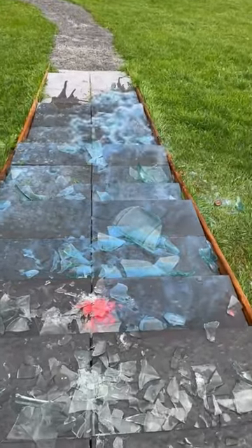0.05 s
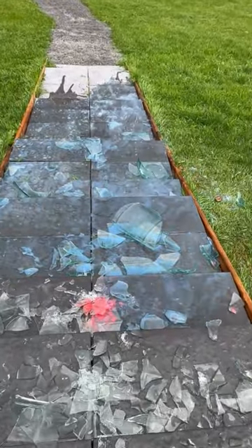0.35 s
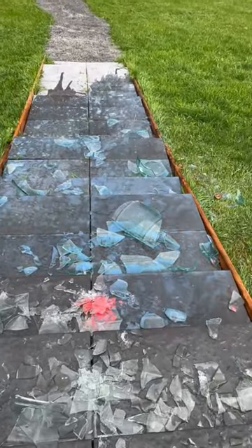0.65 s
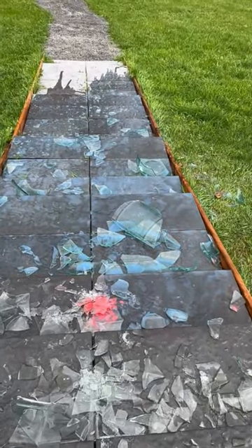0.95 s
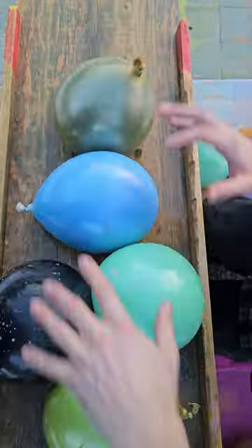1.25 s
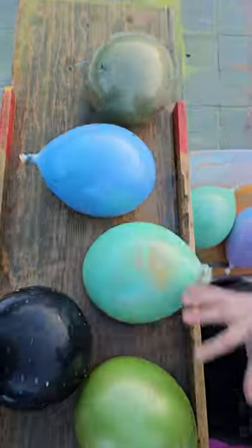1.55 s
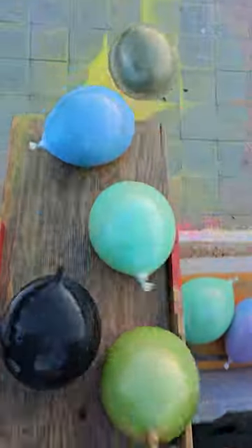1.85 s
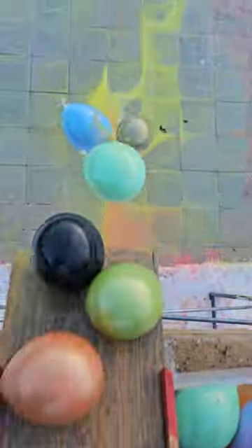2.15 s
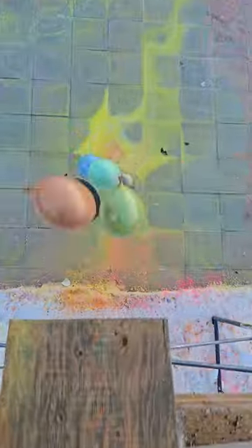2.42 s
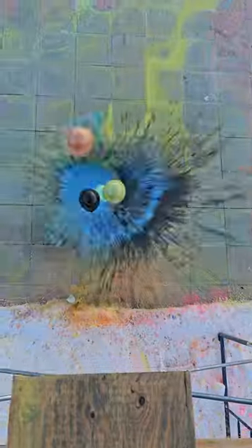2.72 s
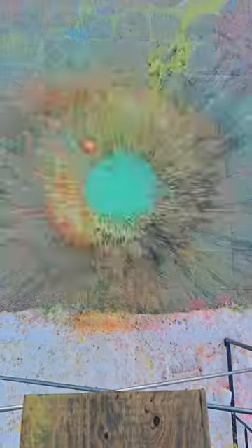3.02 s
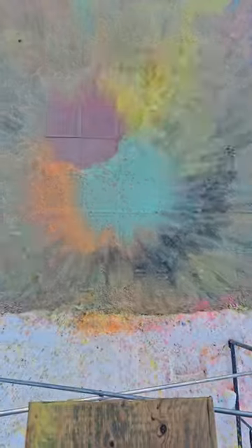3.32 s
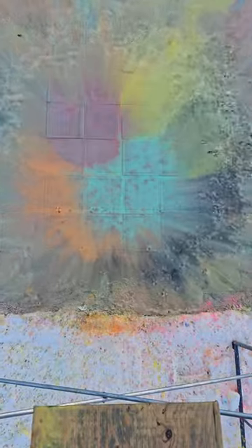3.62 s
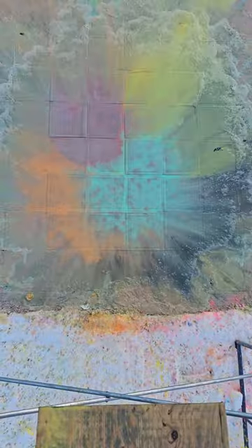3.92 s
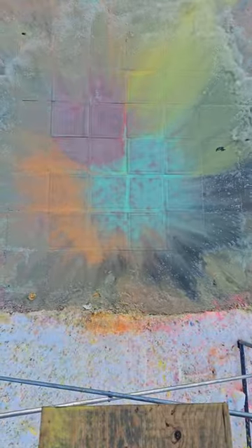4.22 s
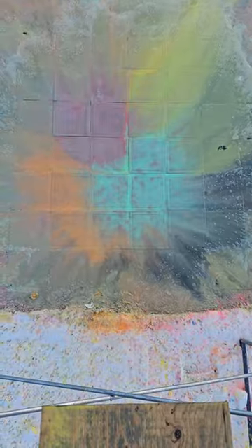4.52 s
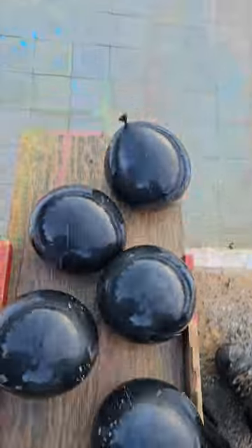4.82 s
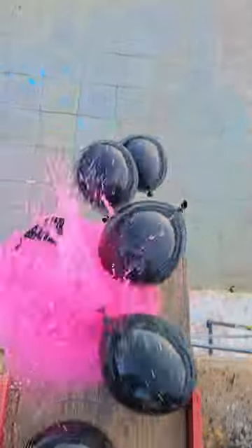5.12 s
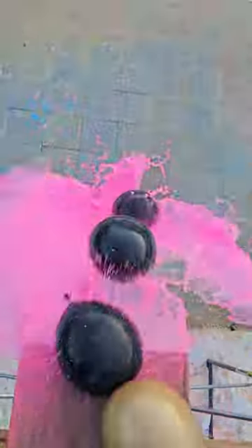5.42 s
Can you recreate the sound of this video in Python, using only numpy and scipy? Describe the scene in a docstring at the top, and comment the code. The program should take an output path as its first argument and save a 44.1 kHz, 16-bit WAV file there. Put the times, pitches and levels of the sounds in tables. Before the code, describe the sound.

After a brief tinkle of broken glass, paint balloons rumble and slosh over wood, splatter on the ground, and one rips open nearby.

```python
"""A quiet yard. The last pieces of a smashed glass jar clink and skitter down a flight of hard steps.
Paint-filled balloons then rumble, slosh, squeak and bump along a wooden ramp and burst one after another
on the paving far below: the liquid thuds, the skin slaps, paint jets out and rains down as spray.
A second batch rolls along the ramp; one balloon rips open close by and its paint gurgles over the board."""
import sys
import numpy as np
from scipy import signal
from scipy.fft import rfft, irfft, next_fast_len
from scipy.io import wavfile

SR = 44100
rng = np.random.default_rng(int(sys.argv[2]) if len(sys.argv) > 2 else 0)


def dump_mix(stems):
    """Bounce the given channels to the path in sys.argv[1] as a 16-bit WAV at rate SR."""
    frames = np.atleast_2d(stems).T  # one column per channel
    limited = np.clip(frames, -1, 1)  # hard clip at full scale
    pcm = np.round(limited * 32767).astype(np.int16)
    wavfile.write(sys.argv[1], SR, pcm)


N = 245195

# Table levels are faders ahead of each layer's own gain; spectra give tone colour only.
# glass landing on a step: t/s, clink level/dB, knock level/dB
LANDINGS = [(0.0034, -44, -43), (0.025, -42, -54), (0.0485, -37.5, -46), (0.0668, -32.5, -36.5),
            (0.0813, -38, -52), (0.1044, -42, -48), (0.2015, -36, -55), (0.2225, -47, -40),
            (0.3343, -41.5, -51), (0.3598, -39.5, -42.5), (0.445, -45, -45.5), (0.4773, -35.5, -75),
            (0.4909, -40.5, -48.5), (0.554, -65, -50), (0.5927, -46, -65), (0.6231, -41.5, -54),
            (0.716, -35, -64), (0.823, -49, -75), (0.863, -45, -82), (0.9342, -38, -76), (0.9808, -50, -82),
            (1.031, -51.5, -77), (1.0827, -42, -70), (1.1393, -36, -68)]
# modes of the tumbling piece of jar: f/Hz, level/dB, t60/s
JAR_MODES = [(1552, 6.5, 0.05), (1720, 5.5, 0.074), (2150, -11, 0.16), (2410, -17, .1), (2690, 7, 0.034),
             (2920, -2, 0.098), (3233, 4.5, 0.036), (3260, -14, 0.072), (3570, -13, 0.057),
             (3870, -2.5, 0.06), (5550, -15, 0.13), (6030, -11.5, 0.12), (6300, -25, 0.055),
             (6520, -14, 0.11), (7300, -30, 0.12), (7500, -29, 0.082), (7500, -28, 0.11),
             (9500, -34, 0.091), (9350, -38, .07)]
# modes of one long-ringing shard: f/Hz, level/dB, t60/s
SHARD_MODES = [(1494, -50, 0.87), (1870, -48.5, 0.53), (2520, -44, 0.25)]
# crunch of glass chips: f/Hz, level/dB
CHIP_EQ = [(650, -46), (1100, -15), (1800, -4), (2270, -6), (3110, -3.5), (3960, -5), (4160, -16.5),
           (7340, -8.5), (9430, -31), (11000, -52), (14300, -82), (22000, -120)]
# knock of a step: f/Hz, level/dB
STEP_EQ = [(110, -49), (180, -6), (396, -9), (669, 3), (1070, -11.5), (1260, -5.5), (1500, -24),
           (1950, -39), (3300, -120)]
# low ambience by the steps: f/Hz, level/dB
STEPS_AIR_EQ = [(15, -37), (25, -13), (74, 14), (273, -10), (585, -9), (981, -14.5), (1570, -15),
                (2380, -34), (2760, -20), (3280, -25), (4630, -31), (6530, -29), (9000, -37), (11700, -74),
                (19800, -120)]
# batches rolling down the ramp: start t/s, end t/s, first level/dB, swell/(dB/s), dryness/dB
BATCHES = [(1.275, 2.609, -7.5, 8, -0.5), (4.69, 5.6, -4, 6.5, 1)]
# a balloon lurching along the wood: t/s, rumble level/dB, slosh level/dB, scuff level/dB
LURCHES = [(1.705, -49.5, -54, -58), (1.765, -58, -49.5, -58), (1.83, -49, -60, -68),
           (1.946, -41, -59, -66), (2.044, -49, -50, -53), (2.09, -50, -69, -59), (2.305, -25, -48.5, -62),
           (2.355, -37, -54.5, -71), (2.395, -37, -45, -49.5), (2.43, -40.5, -44.5, -56),
           (2.478, -38.5, -48, -59), (4.825, -56, -67, -54), (5.001, -49, -55, -49.5),
           (5.301, -68, -48, -78), (5.524, -45, -66, -52)]
# rumble of the ramp: f/Hz, level/dB
ROLL_EQ = [(15, -37), (25, -1), (70, 1), (94, 3), (134, -5), (242, -2), (274, -4), (314, -12), (370, -13.5),
           (500, -10), (650, -40), (1100, -120)]
# sloshing paint: f/Hz, level/dB
SLOSH_EQ = [(210, -32), (350, -11), (639, 0), (958, -3.5), (1300, -1), (1460, -2.5), (3000, -14),
            (3900, -47), (6600, -120)]
# rubbing and spatter on wood: f/Hz, level/dB
RUB_EQ = [(1120, -34), (1900, -14), (2530, -4), (4280, -4), (6620, -11.5), (10500, -15.5), (11400, -13.5),
          (15000, -19.5), (16000, -15)]
# fine stick-slip of rubber on wood: f/Hz, level/dB
SIZZLE_EQ = [(5000, -19), (9000, -5.5), (12000, 0.5), (16000, 0.5)]
# ambience of the yard: f/Hz, level/dB
YARD_AIR_EQ = [(18, -68), (30, -33.5), (64, -13.5), (98, -5.5), (145, -8.5), (245, -11), (328, -18.5),
               (364, -4), (394, -21.5), (988, -32.5), (2540, -52), (4300, -39), (6550, -34), (11400, -34),
               (16000, -34.5)]
# rubber squeaks: t/s, length/s, first f/Hz, last f/Hz, level/dB
SQUEAKS = [(1.433, 0.015, 8500, 8960, -55.5), (1.824, 0.09, 2000, 2190, -56.5),
           (1.835, 0.078, 291.5, 366, -41.5), (2.077, 0.048, 632, 837, -45),
           (2.564, 0.0081, 1223, 1453, -25.5), (5.002, 0.017, 914, 720, -36)]
# balloons bumping the ramp: t/s, tick level/dB, board level/dB
BUMPS = [(1.483, -41.5, -48), (1.523, -43.5, -46.5), (1.7003, -28.5, -40.5), (1.7513, -22.5, -36),
         (1.9641, -27.5, -30.5), (1.9804, -25, -21.5), (2.570, -39.5, -30), (4.784, -42, -56),
         (4.822, -29, -40), (4.832, -34, -31.5), (4.8471, -13, -12.5), (5.0194, -23.5, -35),
         (5.0226, -29.5, -30), (5.0553, -27, -31.5), (5.311, -40, -41.5), (5.536, -28, -41.5)]
# modes of the ramp's board: f/Hz, level/dB, t60/s
BOARD_MODES = [(195, -7.5, 0.25), (237.7, -8, 0.2), (295, -1, 0.06), (452, -6, 0.054), (492.3, -4, 0.079),
               (693, -2.5, 0.055), (845, -6, 0.03), (1240, -11, 0.046), (1441, -5.5, 0.028),
               (1870, -7.5, 0.028), (1954, -24.5, 0.022)]
# thuds and plops of the liquid mass: t/s, level/dB, f/Hz, cycles to the peak, overtone level/dB
THUDS = [(1.902, -27.5, 204, 1.1, -24), (1.984, -21.5, 221.5, 2, -4), (2.263, -10.5, 180, 0.78, -16.5),
         (2.277, -15.5, 227, 0.42, -7.5), (2.537, -20.5, 229, 2.3, -24.5), (2.594, -12.5, 163, 0.63, -21.5),
         (2.613, -3, 204.4, 1.32, -5), (2.643, -8.5, 253.7, 2.7, -21.5), (2.718, -12.5, 228, 0.81, -18),
         (2.774, -3, 243, 2.1, -9.5), (2.796, -3.5, 217.5, 2.6, -16), (2.887, -5.5, 202, 0.71, -26.5),
         (2.902, -17.5, 176, 0.8, -26.5), (2.931, -13, 159, 0.97, -20.5), (2.976, -15.5, 197, 1, -37.5),
         (3.009, -21, 194, 1.73, -33), (3.037, -23.5, 136, 1.3, -28), (4.853, -15.5, 227, 1.8, -15),
         (4.885, -28, 215, 1.6, -39), (5.027, -26, 237, 1, -21), (5.088, -20, 212, 2.05, -15.5)]
# faster shapes of the wobbling mass: multiple of its pitch, level/dB
OVERTONES = [(1.92, 3), (3.15, -4.5)]
# quiver after a thud: f/Hz, level/dB
QUIVER_EQ = [(45, -17), (85, 2), (130, -0.5), (270, 1.5), (340, -10), (520, -15), (750, -34.5)]
# a balloon flopping or bursting: t/s, hiss level/dB, slap level/dB, hold/s
BURSTS = [(2.274, -56, -40, .008), (2.301, -44, -28.5, 0.042), (2.5746, -21.5, -18, 0.0022),
          (2.613, -32.5, -9.5, 0.0049), (2.628, -23, -16, 0.0096), (2.638, -26.5, -20, 0.0078),
          (2.693, -29, -47.5, .002), (2.736, -21.5, -22.5, 0.018), (2.771, -43, -24.5, .06),
          (2.853, -27, -34.5, .018), (2.9455, -22, -21.5, 0.0093), (3.036, -22.5, -31.5, 0.0074),
          (3.118, -19.5, -13.5, 0.00099)]
# jetting liquid: f/Hz, level/dB
JET_EQ = [(1000, -2.5), (2000, 4), (3800, 8), (6000, 0), (9000, -1), (16000, -8.5)]
# skin slapping the ground: f/Hz, level/dB
SLAP_EQ = [(200, -1), (400, -5), (750, 2.5), (1400, -3.5), (2200, -12.5), (4000, -29.5)]
# falling drops: f/Hz, level/dB
SPRAY_EQ = [(1120, -36.5), (1900, -8.5), (2690, -5), (4280, 0.5), (6680, -5.5), (7430, -2.5), (10700, -5.5),
            (15200, -4), (16000, -18)]
# a balloon ripping close by: t/s, level/dB, rise/s, hold/s
RIPS = [(5.079, -13.5, 0.0096, 0.0075), (5.4008, -34.5, 0.00051, 0.0014)]
# tearing rubber: f/Hz, level/dB
RIP_EQ = [(350, -31), (600, -2), (1210, 1.5), (1850, -14), (2120, -4), (8860, -4.5), (9360, -2),
          (14300, -5.5), (16000, -12)]
# focused stereo image, straight ahead: f/Hz, left-right correlation
AHEAD = [(100, .98), (1000, 0.67), (10000, 0.23)]
# diffuse stereo image: f/Hz, left-right correlation
WIDE = [(100, 0.95), (300, 0.74), (700, 0.03), (1500, 0), (4000, 0), (16000, 0)]
# stereo image from below, solid mids and open top: f/Hz, left-right correlation
BELOW = [(200, 0.76), (1000, 0.85), (3000, 0.089), (16000, 0.1)]

STEPS_UNTIL_S, SHOWER_AT_S = 1.285, 2.611


def amp(db):
    """Decibels to gain."""
    return 10 ** (np.asarray(db) / 20)


def rms_one(x):
    """Scale to unit rms."""
    return x / np.sqrt(np.mean(x ** 2) + 1e-20)


def seconds():
    """The time of every sample."""
    return np.arange(N) / SR


def during(start, end):
    """A gate with 10 ms edges, open between two times."""
    t = seconds()
    return np.clip((t - start) / .01 + .5, 0, 1) * np.clip((end - t) / .01 + .5, 0, 1)


def surge(s, rise, hold, t60):
    """An envelope from time s: linear attack, then a release that begins at s + hold."""
    age = np.maximum(seconds() - s, 0)
    return np.minimum(age / rise, 1) * np.exp(-np.log(1000) * np.clip((age - hold) / t60, 0, 10))


def gush(s, rise, hold, t60, tail_db, tail_t60):
    """A surge with a fainter, longer tail."""
    return surge(s, rise, hold, t60) + amp(tail_db) * surge(s, rise, hold, tail_t60)


def drift(rate):
    """Random modulation gliding through `rate` values a second, each of spread 1."""
    knots = rng.standard_normal(int(N / SR * rate) + 2)
    return np.interp(seconds() * rate, np.arange(len(knots)), knots)


def at_hz(points, hz):
    """Read a curve on a log-frequency axis."""
    f, value = np.transpose(points)
    return np.interp(np.log(hz), np.log(f), value)


def colour(pair, eq, image):
    """Two unrelated signals become mid and side of an equalised stereo pair; rms 1."""
    size = next_fast_len(N)
    hz = np.maximum(np.fft.rfftfreq(size, 1 / SR), 1)
    octaves_outside = np.abs(np.log2(hz / np.clip(hz, eq[0][0], eq[-1][0])))
    gain = amp(at_hz(eq, hz) - 30 * octaves_outside)
    alike = np.clip(at_hz(image, hz), -1, 1)
    mid, side = rfft(pair, size) * gain * np.sqrt([1 + alike, 1 - alike])
    return rms_one(irfft([mid + side, mid - side], size)[:, :N])


def noise(eq, image):
    """Smooth coloured stereo noise."""
    return colour(rng.standard_normal((2, N)), eq, image)


def grains(per_s, spread_db):
    """Two streams of random tiny impacts, many small and a few large; rms 1."""
    sizes = amp(spread_db * np.minimum(rng.exponential(1, (2, N)), 4))
    return rms_one(sizes * rng.choice([-1, 1], (2, N)) * (rng.random((2, N)) < per_s / SR))


def strikes(times, db):
    """One click for each event."""
    out = np.zeros(N)
    out[np.clip(np.round(times * SR).astype(int), 0, N - 1)] = amp(db)
    return out


def decays(times, db, t60):
    """Each event triggers an exponentially falling envelope."""
    return signal.lfilter([1], [1, -amp(-60 / (t60 * SR))], strikes(times, db) + 1e-18)


def ring(clicks, hz, t60):
    """A unit click sets a sine of height 1 ringing."""
    r, w = amp(-60 / (t60 * SR)), 2 * np.pi * hz / SR
    return signal.lfilter([0, np.sin(w)], [1, -2 * r * np.cos(w), r * r], clicks + 1e-18)


def struck(modes, times, db, chatter, vary_db, width):
    """Every blow excites each mode with its own strength, a little differently on each side."""
    out = np.zeros((2, N))
    for hz, level_db, t60 in modes:
        mid_vary, side_vary, jitter = np.clip(rng.standard_normal((len(times), 3)), -1.5, 1.5).T
        sign = rng.choice([-1, 1])
        mid = strikes(times, db + vary_db * mid_vary) * sign + chatter[0]
        side = width * (strikes(times + jitter / hz, db + vary_db * side_vary) + chatter[1])
        out += amp(level_db) * ring(np.array([mid + side, mid - side]), hz, t60)
    return out


def pan(x, right_db):
    """Lean a sound to the right."""
    return x * amp([[-right_db / 2], [right_db / 2]])


def lag(x, left_late_ms):
    """Pan by delay: a sound reaches the farther side later."""
    t, half = seconds(), left_late_ms / 2000
    return np.array([np.interp(t - half, t, x[0]), np.interp(t + half, t, x[1])])


def yard_reverb(x, wet_db, t60, dull_hz):
    """Nearby walls and ground scatter back a short, dull tail."""
    t = np.arange(SR // 2) / SR
    scatter = rng.standard_normal((2, len(t))) * amp(-60 * t / t60) * (t > .006)
    bass = signal.butter(1, 500, fs=SR)
    scatter += signal.lfilter(*bass, scatter[0] - scatter)   # long waves reach both sides alike
    scatter /= np.sqrt(np.sum(scatter[0] ** 2))
    tail = signal.lfilter(*signal.butter(1, dull_hz, fs=SR), scatter)
    return x + amp(wet_db) * signal.fftconvolve(x, tail, axes=1)[:, :N]


def touches(rebound_s=0.014):
    """After each landing the glass drops back once, more softly: times, clink and knock levels."""
    landings = np.array(LANDINGS)
    rebounds = landings + [0, -8, -7.5]
    rebounds[:, 0] += rebound_s * rng.uniform(.75, 1.25, len(landings))
    return np.vstack([landings, rebounds]).T


def loose_shards(times, db, t60, late_s, count):
    """Each landing knocks other pieces about, each with a pitch of its own; small ones are fainter."""
    out, t = np.zeros((2, N)), np.arange(SR // 6) / SR
    for s, level_db, pieces in zip(times, db, rng.random((len(times), count, 3))):
        for pitch, late, side in pieces:
            hz, start = 1400 * 7 ** pitch, int((s + late_s * late ** 2) * SR)
            tone = amp(level_db - 11 * pitch - 60 * t / t60) * np.sin(2 * np.pi * hz * t)
            out[:, start:start + len(t)] += pan(tone, right_db=5.7 * (side - .5))
    return out


def jar(shard_at_s=0.054):
    """The piece of jar rings, chatters and chips on each landing, and the step knocks under it."""
    times, clink_db, knock_db = touches()
    chatter = amp(-19) * decays(times, clink_db, t60=0.061) * grains(per_s=500, spread_db=4.5)
    rings = amp(-19.5) * struck(JAR_MODES, times, clink_db, chatter, vary_db=9.5, width=0.039)
    loose = amp(-15.5) * loose_shards(times, clink_db, t60=0.057, late_s=0.024, count=18)
    shard = sum(ring(strikes(np.array([shard_at_s]), db), hz, t60) for hz, db, t60 in SHARD_MODES)
    crunch = colour(grains(per_s=1400, spread_db=2), CHIP_EQ, AHEAD)
    chips = amp(-10.5) * decays(times, clink_db, t60=0.075) * crunch
    knocks = amp(-1.5) * decays(times, knock_db, t60=0.084) * noise(STEP_EQ, AHEAD)
    high_cut = signal.butter(8, 10000, fs=SR, output="sos")
    return signal.sosfilt(high_cut, rings + loose + shard + chips + knocks)


def steps(swell_db_per_s=9.5):
    """A slowly swelling bed of hum and rumble lies under splinters that skitter on after each landing."""
    times, clink_db, _ = np.transpose(LANDINGS)
    bed_db = -63.5 + swell_db_per_s * np.minimum(seconds(), STEPS_UNTIL_S) + 0.58 * drift(rate=28)
    hum = np.sin(2 * np.pi * np.cumsum(73 + 2 * drift(rate=11.95)) / SR)
    bed = amp(bed_db) * (noise(STEPS_AIR_EQ, AHEAD) + amp(2) * hum)
    splinters = colour(grains(per_s=900, spread_db=3), CHIP_EQ, AHEAD)
    grit = decays(times, clink_db - 31.5, t60=0.49) * splinters
    return (bed + grit) * (1 - during(STEPS_UNTIL_S, N / SR + 1))


def bubbles(per_s, cycles):
    """Small pockets in the liquid ring for some cycles each, rising in pitch as they surface."""
    out, t = np.zeros((2, N + SR // 20)), np.arange(SR // 20) / SR
    for when, pitch, size, side in rng.random((int(per_s * N / SR), 4)):
        hz, start = 450 * 10 ** pitch, int(when * N)
        age = t * hz / cycles
        blip = amp(-20 * np.sqrt(size) - 60 * age) * np.sin(2 * np.pi * hz * t * (1 + .15 * age))
        out[:, start:start + len(t)] += pan(blip, right_db=10 * (side - .5))
    return rms_one(out[:, :N])


def ramp():
    """Balloons gather speed, rumbling, sloshing and rubbing on the wood; paint washes over the paving."""
    speed, dryness = np.zeros(N), np.ones(N)
    for start, end, db, db_per_s, dry_db in BATCHES:
        gate = during(start, end)
        speed += amp(db + db_per_s * np.clip(seconds() - start, 0, end - start)) * gate
        dryness *= amp(dry_db * gate)
    rolling = amp(-48) * speed
    sloshing = amp(-55.5) * speed / dryness
    sliding = amp(-60) * dryness * speed ** 1.4   # rubbing grows faster with speed than the rest
    for s, rumble_db, slosh_db, scuff_db in LURCHES:
        lurch = surge(s, rise=0.01, hold=0.016, t60=.16)
        rolling += amp(rumble_db) * lurch
        sloshing += amp(slosh_db) * lurch
        sliding += amp(scuff_db) * lurch
    sloshing += amp(-40.5) * surge(SHOWER_AT_S, rise=0.01, hold=0.41, t60=1.8)   # wash on the paving
    roll = rolling * amp(0.91 * drift(rate=25)) * noise(ROLL_EQ, WIDE)
    swish = amp(-1.5) * colour(grains(per_s=2300, spread_db=0.5), SLOSH_EQ, WIDE)
    slosh = sloshing * amp(3.6 * drift(rate=19)) * (swish + amp(-5) * bubbles(per_s=260, cycles=38))
    flutter = amp(1.5 + 2 * drift(rate=70))
    rub = sliding * flutter * colour(grains(per_s=6900, spread_db=4), RUB_EQ, WIDE)
    sizzle = colour(grains(per_s=3000, spread_db=4.5), SIZZLE_EQ, WIDE)
    rub += amp(-66.5) * speed * dryness ** 2 * sizzle
    return roll + slosh + pan(rub, right_db=4)


def yard_air():
    """Faint, wide ambience takes over from the bed by the steps."""
    return amp(-60) * noise(YARD_AIR_EQ, WIDE) * during(STEPS_UNTIL_S, N / SR + 1)


def squeaks():
    """Rubber sticks and slips in short, unsteady glides."""
    out, waver = np.zeros(N), 1 + .022 * drift(rate=400)
    for s, length, first_hz, last_hz, db in SQUEAKS:
        along = np.clip((seconds() - s) / length, 0, 1)
        hz = (first_hz + (last_hz - first_hz) * along) * waver
        out += amp(db) * np.sin(np.pi * along) * np.sin(2 * np.pi * np.cumsum(hz) / SR)
    return out


def bumps():
    """Taut rubber ticks against the wood and the board answers with a hollow, damped knock."""
    times, tick_db, board_db = np.transpose(BUMPS)
    rattle = amp(-22) * decays(times, board_db, t60=0.038) * grains(per_s=600, spread_db=3)
    board = amp(-6) * struck(BOARD_MODES, times, board_db, rattle, vary_db=5.5, width=0.19)
    body = noise([(170, -13), (450, -2), (800, -5), (1300, -11.5)], WIDE)
    wobble = amp(-1.5) * decays(times, board_db, t60=0.068) * body
    tick = noise([(600, -4), (1300, -1), (2400, -2.5), (4000, 4.5), (6500, -12), (10000, -17),
                  (16000, -26.5)], BELOW)
    snap = decays(times, tick_db, t60=0.013) + amp(-16.5) * decays(times, tick_db, t60=0.071)
    return lag(board + wobble, left_late_ms=-0.19) + pan(amp(-4.5) * snap * tick, right_db=4)


def swing(s, hz, cycles_to_peak):
    """A pressure swing that swells and dies within a few cycles."""
    out, near = np.zeros(N), slice(int(s * SR), int(s * SR) + SR // 8)
    cycles = np.maximum(seconds()[near] - s, 0) * hz
    swell = cycles / cycles_to_peak
    out[near] = (swell * np.exp(1 - swell)) ** 3 * np.sin(2 * np.pi * cycles)
    return out


def thuds(overtone_span=.75, slump_late_s=.009, quiver_t60=0.35):
    """A landing mass of liquid shoves the air for a few cycles, slumps more slowly, and quivers on."""
    out = np.zeros(N)
    for s, peak_db, hz, cycles_to_peak, overtones_db in THUDS:
        upper = sum(amp(overtones_db + db) * swing(s, hz * ratio, cycles_to_peak * ratio * overtone_span)
                    for ratio, db in OVERTONES)
        slump = amp(-11) * swing(s + slump_late_s, hz * .56, cycles_to_peak=1.2)
        out += amp(peak_db) * (swing(s, hz, cycles_to_peak) + upper + slump)
    times, peak_db = np.transpose(THUDS)[:2]
    quiver_power = decays(times + slump_late_s, 2 * (peak_db - 14.5), quiver_t60 / 2)   # powers add
    return lag([out, out], left_late_ms=.42) + np.sqrt(quiver_power) * noise(QUIVER_EQ, WIDE)


def bursts(rise_s=.0006):
    """The skin slaps the ground and parts with a crack; liquid jets out and breaks into drops."""
    hiss_level, slap_level = np.zeros(N), np.zeros(N)
    for s, hiss_db, slap_db, hold in BURSTS:
        jet = gush(s, rise_s, hold, t60=0.036, tail_db=-11.5, tail_t60=.13)
        crack = amp(-11.5) * surge(s, rise_s, hold=0.001, t60=.012)
        hiss_level += amp(hiss_db) * (jet + crack)
        slap_level += amp(slap_db) * jet
    hiss = amp(-5.5) * hiss_level * colour(grains(per_s=4200, spread_db=3), JET_EQ, BELOW)
    slap = amp(-6.5) * slap_level * colour(grains(per_s=3000, spread_db=1.5), SLAP_EQ, AHEAD)
    return pan(hiss, right_db=2) + pan(lag(slap, left_late_ms=0.51), right_db=1)


def shower(build_s=0.5, flight_s=0.61, mist_db=-72.5):
    """Paint thrown up by the bursts rains down as fine drops; a last mist settles until the next batch."""
    drops = colour(grains(per_s=16000, spread_db=3.5), SPRAY_EQ, WIDE)
    past_peak = seconds() - SHOWER_AT_S - build_s
    build_db = 11.5 * np.minimum(past_peak, 0)   # balloons keep bursting
    thin_db = -12 * np.clip(past_peak, 0, flight_s)   # drops are still in the air
    stop_db = -71 * np.maximum(past_peak - flight_s, 0)   # the highest have landed
    level = np.hypot(amp(-37 + build_db + thin_db + stop_db), amp(mist_db))
    return pan(level * drops, right_db=0.5) * during(SHOWER_AT_S, BATCHES[1][0])


def rips():
    """A tear races through the stretched rubber in a short, very bright zip."""
    level = sum(amp(db) * gush(s, rise, hold, t60=0.017, tail_db=-7, tail_t60=0.056)
                for s, db, rise, hold in RIPS)
    return level * pan(colour(grains(per_s=14000, spread_db=1.5), RIP_EQ, BELOW), right_db=3)


def spill():
    """Running paint traps bubbles, throws a brief spray and single drops on the wood, and trickles on."""
    envelope = dict(s=5.11, rise=.02, hold=0.067, t60=0.39)
    gurgle = amp(-3) * bubbles(per_s=370, cycles=39)
    spatter = amp(-4.5) * colour(grains(per_s=370, spread_db=2.5), RUB_EQ, WIDE)
    flow = gush(**envelope, tail_db=-7.5, tail_t60=3.5)
    spray = amp(1) * surge(**envelope) * colour(grains(per_s=3800, spread_db=4), RUB_EQ, WIDE)
    return amp(-42.5) * pan(flow * (gurgle + spatter) + spray, right_db=2)


def scene():
    """Glass on the steps, then balloons on the ramp and the paving; the hits get the yard's reverb."""
    glass = yard_reverb(jar(), wet_db=-22, t60=0.58, dull_hz=4000)
    hits = bumps() + thuds() + bursts() + rips() + squeaks()
    balloons = yard_reverb(hits, wet_db=-13, t60=0.12, dull_hz=1987)
    return glass + steps() + balloons + ramp() + yard_air() + spill() + shower()


def record(dry):
    """Master chain: a hard clip at full scale, then a steep high cut."""
    high_cut = signal.ellip(10, .1, 80, 16100, fs=SR, output="sos")
    return signal.sosfilt(high_cut, np.clip(dry, -1, 1))


dry = scene()
out = record(dry)
dump_mix(out)
```